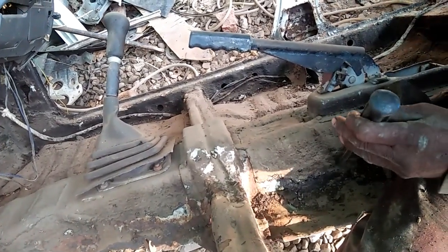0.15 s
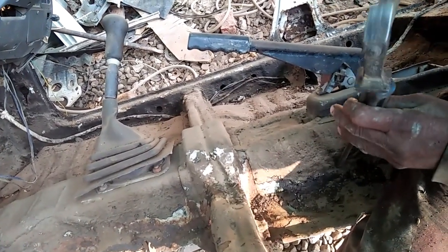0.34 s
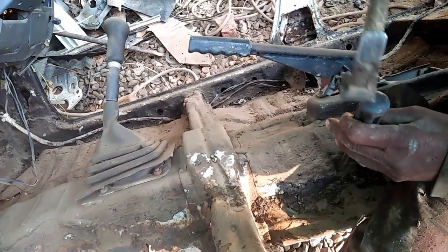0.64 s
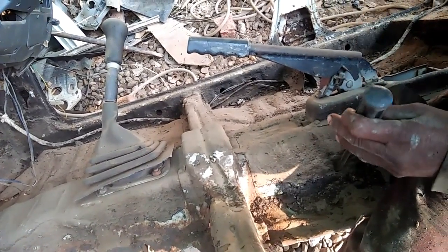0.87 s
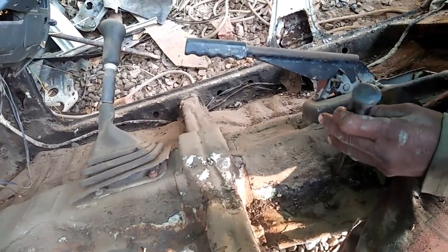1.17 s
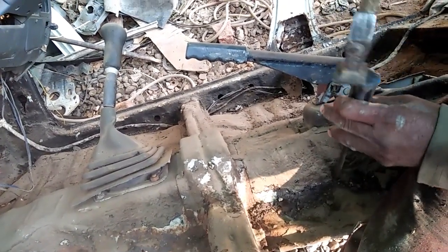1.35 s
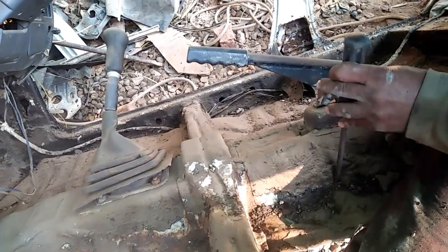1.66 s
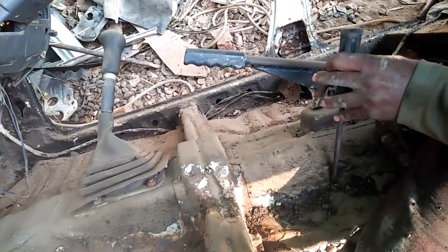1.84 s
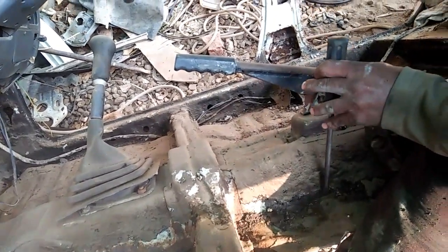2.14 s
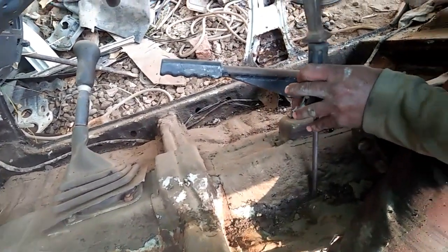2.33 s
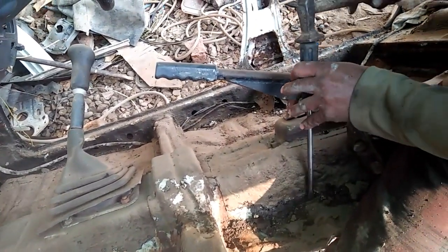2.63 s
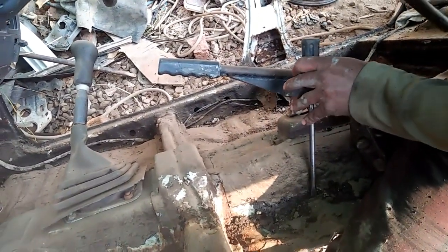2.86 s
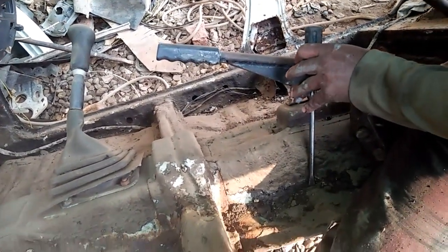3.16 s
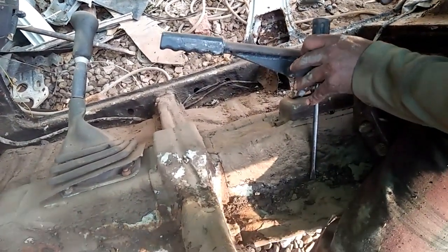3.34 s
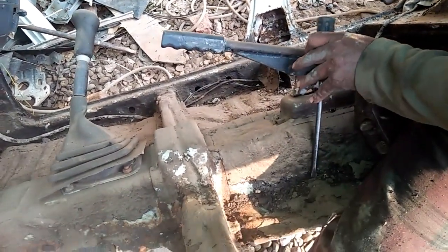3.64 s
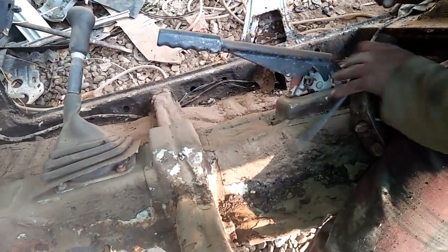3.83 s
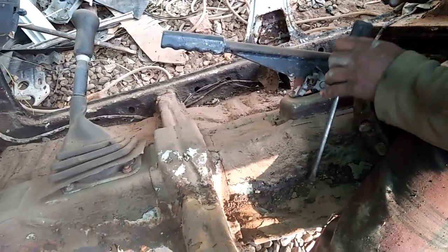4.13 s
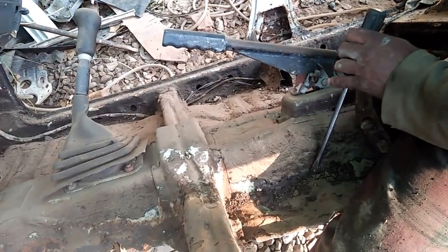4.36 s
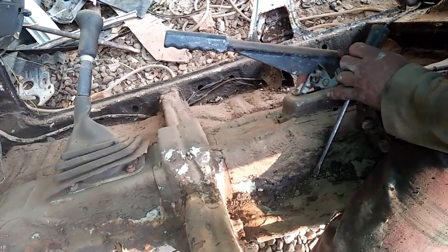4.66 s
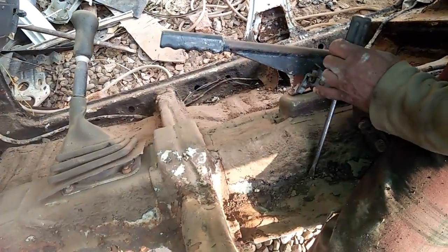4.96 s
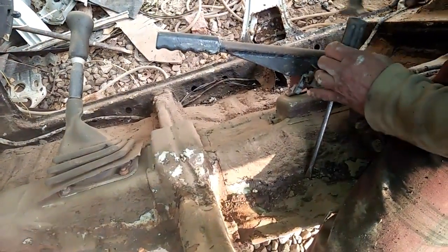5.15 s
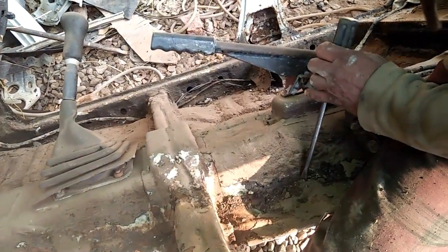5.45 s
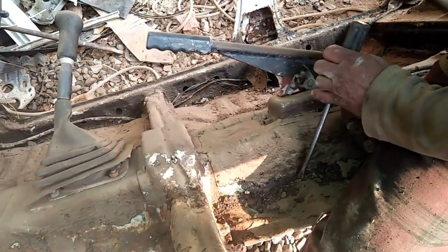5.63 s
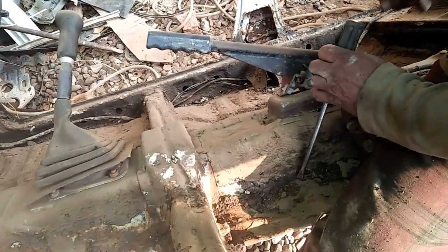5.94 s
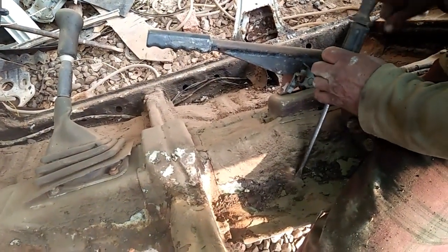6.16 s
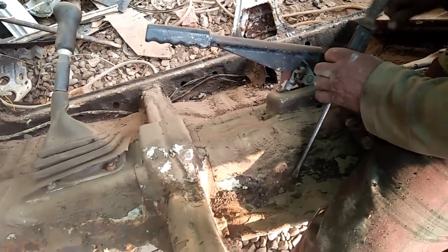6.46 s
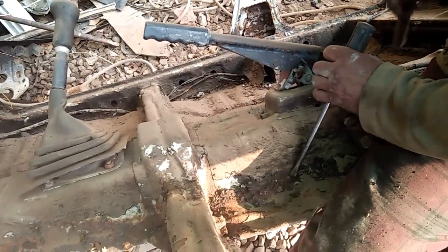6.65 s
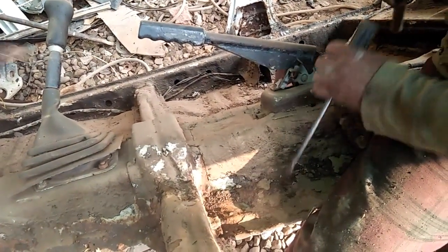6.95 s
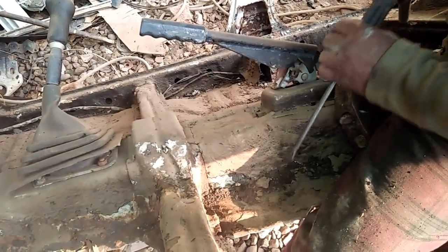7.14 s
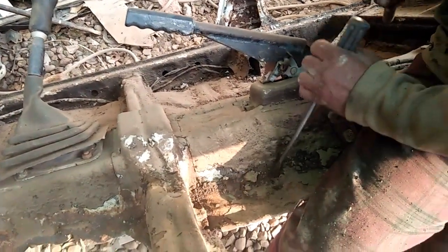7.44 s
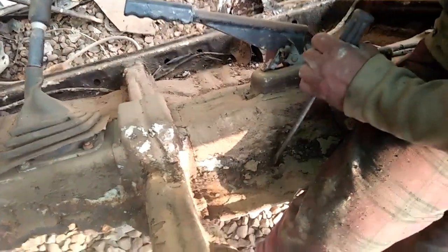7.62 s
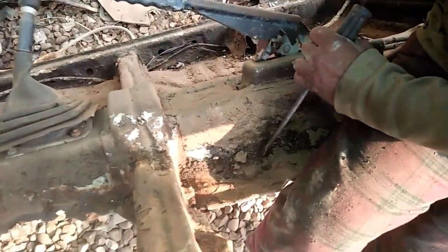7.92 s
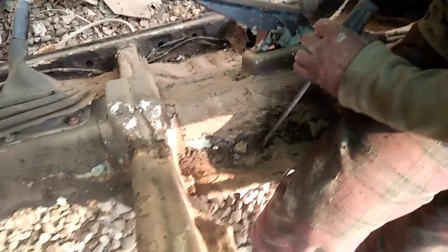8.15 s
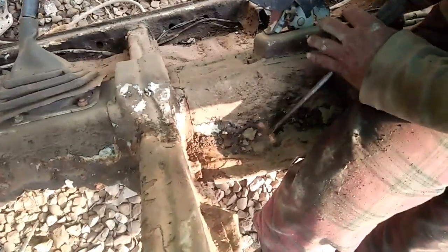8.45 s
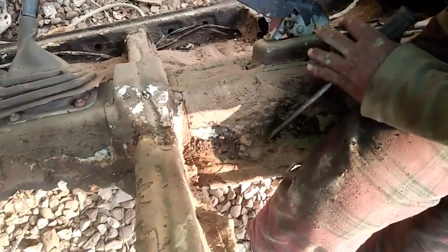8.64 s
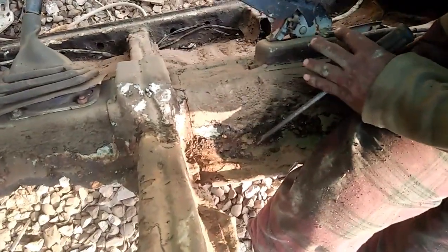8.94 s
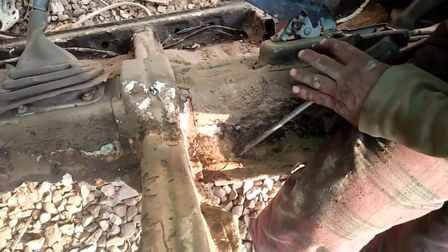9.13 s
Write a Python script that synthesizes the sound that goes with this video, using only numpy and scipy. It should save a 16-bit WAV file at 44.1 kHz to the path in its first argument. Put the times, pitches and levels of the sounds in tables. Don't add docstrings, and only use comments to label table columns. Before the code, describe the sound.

Close outdoors, a hammer drives a chisel into a stripped car's steel floor. Two lighter blows lead to loud, regular ones about three per second, each a dull body thud joined by a harsh, quickly damped panel clang. After a pause with light tip taps and faint scraping, slanted blows resume, slightly duller on top, with another short break and rust flakes ticking on the sheet.

```python
import sys
import numpy as np
from scipy import signal
from scipy.fft import rfft, irfft, next_fast_len
from scipy.io import wavfile
from scipy.ndimage import uniform_filter1d, minimum_filter1d

SR = 44100
rng = np.random.default_rng(int(sys.argv[2]) if len(sys.argv) > 2 else 0)


def voltage_ratio(level):
    return 10 ** (np.asarray(level, float) / 20)


def master_out(mix):
    frames = np.transpose(np.atleast_2d(mix))
    ceiling = np.clip(frames, -1, 1)
    pcm = np.round(ceiling * 32767).astype(np.int16)
    wavfile.write(sys.argv[1], SR, pcm)


N = 409688

# pitch in Hz, level in dB, t60 in seconds.
BODY_MODES = [(65.5, -15.5, 0.3), (84, -17, 0.96), (100.5, -17, 0.61), (123, -19.5, 0.73), (186, -11, 0.36),
              (209, -15.5, 0.46), (304, -20, 0.13), (311, -5, 0.3), (430, -22, 0.51), (576, -23, 0.34),
              (589.6, -12, 0.34)]
# pitch in Hz, level in dB, t60 in seconds.
PUSH_MODES = [(198.24, -2.5, 0.058), (277.5, 6.5, 0.034), (519, -3, 0.098), (964, -0.5, .02)]
# pitch in Hz, level in dB, t60 in seconds.
PANEL_MODES = [(680, -25, 0.19), (726, -9.5, .3), (885.3, 1.5, 0.27), (917, -2.5, 0.43), (1040, 2, 0.21),
               (1143.2, -0.5, 0.51), (1180, -4.5, 0.46), (1242, -1, 0.53), (1336, -3.5, 0.51),
               (1432, -6, .5), (1570, -18, 0.51), (1730, -36.5, .4), (1750, -14, 0.47), (1847, -4, 0.28),
               (2110, -7.5, 0.53), (2446, -12, 0.2), (2380, -14, .3), (2570, -18, 0.53)]
# pitch in Hz, level in dB, t60 in seconds.
CHISEL_MODES = [(2970, 6, 0.026), (4460, 10.5, 0.039), (5440, -19, 0.056), (6400, -19, 0.06),
                (10050, -6, 0.087), (11200, -23, 0.08)]
# band in Hz, level in dB, early t60 in seconds, late level in dB,
# late t60 in seconds.
CLATTER_BANDS = [(36.7, -46, 0.9, -4.5, 1), (157, -27, 0.45, -14, 1), (396, -22, 0.24, -19, 0.13),
                 (980, -6.5, 0.15, -25.5, 0.57), (1440, -4.5, 0.15, -29.5, 0.52),
                 (2730, -3.5, 0.099, -22.5, 0.36), (3545, -4.5, 0.097, -21.5, 0.32),
                 (6070, -14, 0.075, -16, .3), (9100, -10, 0.11, -21.5, 0.41),
                 (13300, -2.5, 0.042, -20.5, 0.75)]

# start in seconds, #
# clang in dB, thud in dB, edge in dB, strongest pitch in Hz.
UPRIGHT_BLOWS = [(.486, -26.5, -26, -33, 1130), (.705, -25, -16.5, -31, 890), (1.089, -13, -12.5, -13, 924),
                 (1.453, -12.5, -13.5, -13.5, 900), (1.821, -14, -13, -17.5, 910),
                 (2.135, -16, -16, -17, 905), (2.461, -20.5, -12, -18, 1070), (2.761, -20, -12, -27.5, 970),
                 (3.073, -16, -13, -18, 1294), (3.374, -16.5, -14.5, -22.5, 1280),
                 (3.632, -18.5, -13, -30, 1033), (3.949, -40, -14.5, -19.5, 762),
                 (3.976, -33, -21, -15.5, 1860)]
# start in seconds, clang in dB, thud in dB,
# edge in dB, strongest pitch in Hz.
SLANTED_BLOWS = [(5.227, -18.5, -19.5, -17, 1034), (5.643, -21.5, -16, -22, 1040),
                 (5.986, -18, -15.5, -16.5, 1030), (6.266, -20.5, -15, -16.5, 1180),
                 (6.555, -22.5, -17, -14, 1040), (6.858, -20.5, -14, -14.5, 1180),
                 (7.627, -26, -20, -26, 894), (7.975, -17, -16, -12, 1220),
                 (8.288, -18.5, -14.5, -16, 1180), (8.579, -20.5, -17.5, -20, 1178),
                 (8.867, -20, -14.5, -20, 860), (9.167, -22.5, -19.5, -15.5, 896)]
# start in seconds, clang in dB, thud in dB, strongest pitch in Hz.
TIP_TAPS = [
    (4.305, -34, -20.5, 1040),
    (4.401, -37.5, -24, 961),
    (4.584, -47.5, -6.5, 890),
    (4.903, -38.5, -18, 876),
    (7.371, -30.5, -20, 1040),
    (7.527, -44.5, -16, 894),
]
# start in seconds, clang in dB, thud in dB, edge in dB,
# sizzle in dB, strongest pitch in Hz.
EARLIER_BLOW = (-0.08, -30, -13.5, -26, -30, 1900)
CHISEL_CLINK = 3.976, -44

# start in seconds, peak in dB, pitch in Hz.
FLAKE_HOPS = [(2.3567, -58, 1680), (2.377, -52, 1360), (3.6549, -24.5, 1460), (4.657, -52.5, 1504),
              (5.0574, -63, 1617), (5.1103, -59, 1600), (6.7433, -33.5, 1490), (6.796, -56, 1940),
              (6.8024, -74, 4050), (6.9652, -41.5, 1800), (7.0618, -64, 2180), (7.119, -52.5, 2230),
              (7.2154, -67, 1770), (7.3425, -71, 1730), (7.4096, -33.5, 1490), (7.863, -64, 2300),
              (8.7465, -74, 4000), (8.7828, -53, 1780), (8.844, -47.5, 1824), (9.108, -75, 3360)]
# start in seconds, peak in dB, pitch in Hz.
TIP_NUDGES = [(0.057, -70, 1163), (3.86, -61, 1206), (3.9, -54, 1240), (3.915, -48, 982),
              (3.932, -46.5, 1300), (3.944, -41.5, 660), (3.958, -46, 1970), (3.989, -38, 1062),
              (4.022, -41, 1035), (4.047, -70.5, 920), (4.559, -59.5, 902), (4.656, -50, 630),
              (5.106, -59.5, 624), (5.164, -65, 633), (5.432, -57, 600), (5.477, -50.5, 743),
              (6.142, -55, 975), (6.49, -63.5, 960), (6.744, -45.5, 875), (7.027, -50.5, 1085),
              (7.118, -40.5, 1069), (7.555, -50, 803), (9.101, -52, 1003), (9.214, -21, 1050)]
# start in seconds, peak in dB, pitch in Hz.
RUST_SPECKS = [(2.2483, -52.5, 5670), (2.3575, -60, 4130), (2.3835, -63, 5850), (2.4299, -61, 5470),
               (3.7165, -63, 12700), (3.8267, -75, 13200), (3.8606, -52.5, 13600), (3.9, -46.5, 12400),
               (3.927, -57, 4410), (4.5775, -62, 12800), (5.7678, -68, 6520), (6.7984, -54.5, 4050),
               (6.8254, -65, 4710), (7.0269, -62, 8800), (7.0888, -67, 12900), (7.1212, -54, 4670),
               (7.1821, -70, 12100), (7.216, -60, 12400), (7.3442, -69, 12300), (7.4135, -44.5, 4580),
               (7.5562, -50.5, 11800), (7.8645, -66, 10300), (7.9344, -53.5, 12400), (8.7415, -58.5, 9250),
               (8.8428, -56, 4090), (9.0084, -61, 12200), (9.2055, -48, 4050)]
# start in seconds, # length in
# seconds, hiss in dB, rasp in dB.
TIP_SCRAPES = [(0, 0.085, -105, -69), (.72, 0.09, -88.5, -74.5), (1.25, 0.16, -92, -64),
               (1.396, 0.053, -77, -62.5), (2.247, 0.6, -89.5, -63.5), (2.78, 0.1, -73, -70),
               (3.65, 0.1, -78, -71), (3.8, 0.18, -84, -63), (4.549, .08, -87.5, -61),
               (5.051, 0.22, -104, -69), (5.35, 0.27, -92.5, -68.5), (6.923, 0.33, -83, -67.5),
               (7.403, 0.044, -77, -43), (7.829, 0.37, -83.5, -63), (8.085, 0.2, -88.5, -58.5),
               (8.642, 0.11, -83, -75), (9.093, 0.065, -83, -52), (9.196, 0.08, -65.5, -43)]

# frequency in Hz, density in dB per Hz.
FLAKE_SPECTRUM = [(1760, -31.5), (3000, -4.5), (6250, -9.5), (7150, -13.5), (13700, -9), (15000, -20.5)]
# frequency in Hz, density in dB per Hz.
RASP_SPECTRUM = [(180, -70), (300, -46), (510, -16), (623, -3.5), (844, -6.5), (1630, -6.5), (2900, -21),
                 (3770, -57), (6380, -120)]
# frequency in Hz, density in dB per Hz.
OUTDOOR_SPECTRUM = [(15, -48), (25, 4), (181, -1.5), (450, -7), (515, -18.5), (588, -7), (903, -13),
                    (1720, -15.5), (3630, -34), (13800, -34), (15000, -40)]
# frequency in Hz, gain in dB.
MICROPHONE_RESPONSE = [(10000, -0.5), (14100, 4), (14600, -20.5), (15500, -37), (17000, -59)]

STEEL_LEAD_S, CLANG_LAG_S = .006, .0006
UPRIGHT_SIZZLE_DB, SLANTED_SIZZLE_DB = -1.14, -6.5
TAP_EDGE_DB, TAP_EDGE_GROWS, TAP_SIZZLE_DB = -47.5, 2.8, -38
HOP_BROAD_DB, NUDGE_BROAD_DB, SPIT_DB = -14, -11, -39
TICK_T60_S, TICK_T60_SLOPE = 0.14, -0.29
TICK_RING_DB, TICK_REACH_DB = -10, 20.5
SPECK_DB, SPECK_T60_S, SPECK_SKIRT_DB = -7.5, 0.044, 11
SCRAPE_ATTACK_S, SCRAPE_FADE_DB = 0.028, 6.5
OUTDOOR_DB = -79.5


def unit(x):
    return x / np.sqrt(np.mean(x ** 2) + 1e-20)


def fall(t, t60):
    return np.exp(-np.log(1000) * t / np.maximum(t60, .002))


def coloured(x, points):
    hz, db = np.transpose(points)
    length = x.shape[-1]
    size = next_fast_len(length + 4096)
    log_hz = np.log(np.fft.rfftfreq(size, 1 / SR) + 1)
    gain = voltage_ratio(np.interp(log_hz, np.log(hz), db))
    return irfft(rfft(x, size) * gain, size)[..., :length]


def add(track, s, sound):
    start = round(s * SR)
    part, sound = track[max(start, 0):], sound[max(-start, 0):]
    part[:len(sound)] += sound[:len(part)]


def ring(modes, t, scatter_db, detune, phases, waver=0):
    hz, db, t60 = np.transpose(modes)[:, :, None]
    chance = rng.standard_normal((6, len(modes), 1))
    moved_hz = hz * (1 + detune * chance[0])
    tone = np.sin(2 * np.pi * moved_hz * t + phases * chance[1])
    if waver:
        neighbour_hz = hz * (1 + .03 * chance[3]) + 7 * chance[4]
        tone = tone + waver * np.sin(2 * np.pi * neighbour_hz * t + 3 * chance[5])
    strength = voltage_ratio(db + scatter_db * chance[2])
    return (strength * fall(t, np.minimum(t60, .9)) * tone).sum(0)


def contacts():
    rows = []
    for blows_table, sizzle_db in [(UPRIGHT_BLOWS, UPRIGHT_SIZZLE_DB), (SLANTED_BLOWS, SLANTED_SIZZLE_DB)]:
        for s, db, thud_db, edge_db, hz in blows_table:
            rows.append((s, db, thud_db, edge_db, edge_db + sizzle_db, hz))
    for s, db, thud_db, hz in TIP_TAPS:
        edge_db = TAP_EDGE_DB + TAP_EDGE_GROWS * (db + 37)
        rows.append((s, db, thud_db, edge_db, TAP_SIZZLE_DB, hz))
    return [EARLIER_BLOW] + sorted(rows)


def body_thud(t, db):
    body = [(hz, level - 1.0 + 0.27 * (db + 15.5) * (hz < 130), t60) for hz, level, t60 in BODY_MODES]
    thud = ring(body, t, scatter_db=2.5, detune=.015, phases=.6, waver=.8)
    thud = thud * np.cos(np.pi / 2 * t / t[-1]) ** .5
    push = ring(PUSH_MODES, t[:2048] + .0004, scatter_db=1, detune=.04, phases=0.36)
    thud[:2048] += voltage_ratio(3.5) * push
    return thud * (1 - np.exp(-(t / 0.00065) ** 2))


def clatter(t, edge_db, sizzle_db, stretch):
    hz, db, early, late_db, late = np.transpose(CLATTER_BANDS)[:, :, None]
    log_hz = np.log(np.fft.rfftfreq(len(t), 1 / SR) + 1)
    share = np.array([np.interp(log_hz, np.log(hz[:, 0]), row) for row in np.eye(len(hz))])
    bands = irfft(rfft(rng.standard_normal(len(t))) * share, len(t))
    bands = bands / bands.std(1, keepdims=True)
    lift_db = np.interp(hz, [1200, 3800, 6500], [0, edge_db, sizzle_db])

    crack_level = voltage_ratio(np.where(hz > 5000, 21, 12)) * (hz > 2000)
    crack = crack_level * stretch ** 8.6 * fall(t, 0.0069)

    wander = np.interp(t, np.linspace(0, t[-1], 80), rng.standard_normal(80))
    crackle_db = np.where(hz > 3000, 3.5, 2 * (hz > 300))
    crackle = voltage_ratio(crackle_db * wander)

    early_fall = fall(t, early * np.where(hz < 3000, stretch, 1))
    late_fall = voltage_ratio(late_db) * fall(t, np.where(hz > 5000, .33, late))
    return (voltage_ratio(db + lift_db) * bands * (crack + crackle * (early_fall + late_fall))).sum(0)


def panel_clang(t, db, edge_db, sizzle_db, spot_hz):
    panel = []
    for hz, level, t60 in PANEL_MODES:
        favour = 3.6 * (abs(hz / spot_hz - 1) < .05)
        panel.append((hz, level - 7 * np.abs(np.log2(hz / spot_hz)) + favour, t60))
    stretch = np.clip(1 + .02 * (db + 20), .62, 1.15)
    knock = ring(panel, t, scatter_db=2.0, detune=.006, phases=3, waver=.5)
    knock = knock * (fall(t, 0.12 * stretch) + voltage_ratio(-30))
    knock = knock * (1 - 0.54 * np.exp(-t / 0.0039))
    clang = voltage_ratio(-5.5) * knock + voltage_ratio(-4) * clatter(t, edge_db, sizzle_db, stretch)
    return clang * (1 - np.exp(-t / 0.00067))


def chisel_clink(t):
    return ring(CHISEL_MODES, t, scatter_db=0, detune=0, phases=3, waver=.2)


def blows():
    out, t = np.zeros(N), np.arange(18432) / SR
    for s, db, thud_db, edge_db, sizzle_db, spot_hz in contacts():
        add(out, s - STEEL_LEAD_S, -voltage_ratio(db + thud_db + 2) * body_thud(t, db))
        add(out, s + CLANG_LAG_S, voltage_ratio(db + 2.0) * panel_clang(t, db, edge_db, sizzle_db, spot_hz))
    clink_s, clink_db = CHISEL_CLINK
    add(out, clink_s, voltage_ratio(clink_db) * chisel_clink(t))
    return out


def tick(t, hz, broad_db):
    noise = rng.standard_normal((2, len(t)))
    t60 = TICK_T60_S * (hz / 1000) ** TICK_T60_SLOPE
    shape = fall(t, t60) * (1 - np.exp(-t / 0.0007))

    ratios = np.array([.4, .7, .94, 1, 1.06, 1.4, 2.1, 3.2, 7])
    levels_db = np.array([-30, -8, 0, -broad_db, 0, -8, -22, -38, -60])
    scuff = unit(shape * coloured(noise[0], np.transpose([hz * ratios, levels_db])))
    scuff = scuff * np.sqrt(np.mean(shape ** 2))

    near = []
    for mode_hz, _, mode_t60 in PANEL_MODES:
        octaves = abs(np.log2(mode_hz / hz))
        if octaves < .8:
            near.append((mode_hz, TICK_RING_DB - TICK_REACH_DB * octaves, .4 * mode_t60))
    woken = ring(near, t, scatter_db=3.5, detune=0.0075, phases=3)
    woken = woken * (1 - np.exp(-t / 0.0038)) * (1 - t / t[-1])

    spit = voltage_ratio(SPIT_DB) * unit(coloured(noise[1], FLAKE_SPECTRUM)) * shape * fall(t, 1.5 * t60)
    return scuff + woken + spit


def ticks():
    out, t = np.zeros(N), np.arange(6144) / SR
    for table, broad_db in [(FLAKE_HOPS, HOP_BROAD_DB), (TIP_NUDGES, NUDGE_BROAD_DB)]:
        for s, db, hz in table:
            add(out, s, voltage_ratio(db - 4.5) * tick(t, hz, broad_db))
    return out


def specks():
    out, t, octaves = np.zeros(N), np.arange(3072) / SR, np.array([-2, -1, 0, 1, 2])
    skirt_db = -SPECK_SKIRT_DB * np.abs(octaves) - 20 * (octaves == -2)
    for s, db, hz in RUST_SPECKS:
        tint = np.transpose([hz * 2. ** octaves, skirt_db])
        t60 = SPECK_T60_S * voltage_ratio(0.83 * rng.standard_normal())
        shape = fall(t, t60) * (1 - np.exp(-t / 0.00064))
        snap = unit(coloured(rng.standard_normal(len(t)), tint)) * shape
        add(out, s, voltage_ratio(db + SPECK_DB) * snap)
    return out


def grains(spectrum, rate, size_db, bed):
    hits = (rng.random(N) < rate / SR) * voltage_ratio(size_db * rng.exponential(size=N))
    spread = signal.fftconvolve(hits, fall(np.arange(600) / SR, 0.016))[:N]
    return unit(coloured(rng.standard_normal(N) * (bed + np.abs(spread)), spectrum))


def grit():
    hiss_level, rasp_level = np.zeros(N), np.zeros(N)
    for s, length, hiss_db, rasp_db in TIP_SCRAPES:
        t = np.arange(round(length * SR)) / SR
        stroke = np.clip(np.minimum(t / SCRAPE_ATTACK_S, (length - t) / .012), 0, 1)
        stroke = stroke * voltage_ratio(SCRAPE_FADE_DB * (.5 - t / length))
        add(hiss_level, s, voltage_ratio(hiss_db) * stroke)
        add(rasp_level, s, voltage_ratio(rasp_db) * stroke)
    hiss = hiss_level * grains(FLAKE_SPECTRUM, rate=220, size_db=2.0, bed=0.8)
    rasp = rasp_level * unit(coloured(rng.standard_normal(N), RASP_SPECTRUM))
    return voltage_ratio(1.0) * hiss + voltage_ratio(-9.5) * rasp


def outdoors():
    return voltage_ratio(OUTDOOR_DB) * unit(coloured(rng.standard_normal(N), OUTDOOR_SPECTRUM))


def scene():
    mono = blows() + ticks() + specks() + grit() + outdoors()
    return np.array([mono, mono])


def gain_control(x):
    keep = np.exp(-1 / (0.021 * SR))
    level = signal.lfilter([1 - keep], [1, -keep], np.abs(x))
    return x / (1 + level / 0.11)


def soft_ceiling(x):
    heard = np.abs(coloured(x, [(5000, 3.5), (9000, -17.5)]))
    need = np.minimum(1, voltage_ratio(-14.5) / (heard + 1e-9))
    x = x * uniform_filter1d(minimum_filter1d(need, size=161), size=81)
    return x / (1 + np.abs(x / .14) ** 5) ** (1 / 5)


def treble_side(x):
    smear = rng.standard_normal(400) * fall(np.arange(400) / SR, .02)
    drift = unit(uniform_filter1d(rng.standard_normal(N), size=60))
    treble = coloured(x * drift, [(3000, -83.5), (4200, -11), (9000, 3.0), (13000, -0.5)])
    return voltage_ratio(-16.5) * np.convolve(treble, smear / np.linalg.norm(smear))[:N]


def top_cut(x):
    return signal.sosfilt(signal.butter(12, 15380, fs=SR, output="sos"), x)


def record(dry):
    low_cut = signal.butter(2, 62, "high", fs=SR, output="sos")
    x = coloured(signal.sosfilt(low_cut, dry[0]), MICROPHONE_RESPONSE)
    x = soft_ceiling(gain_control(x))
    side = treble_side(x)
    return top_cut(np.array([x + side, x - side]))


dry = scene()
out = record(dry)
master_out(out)
```